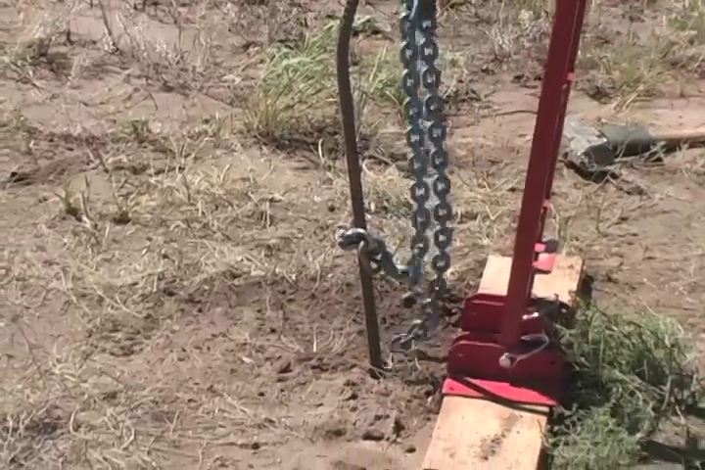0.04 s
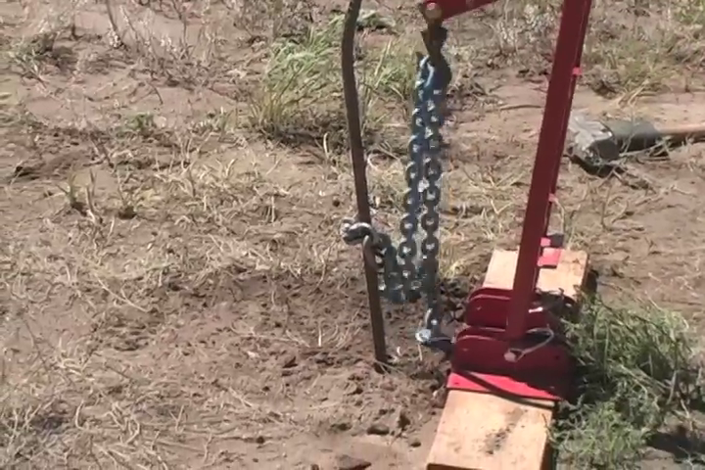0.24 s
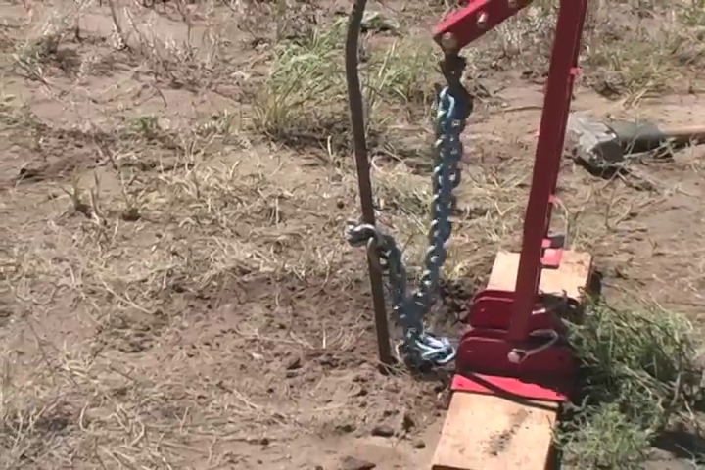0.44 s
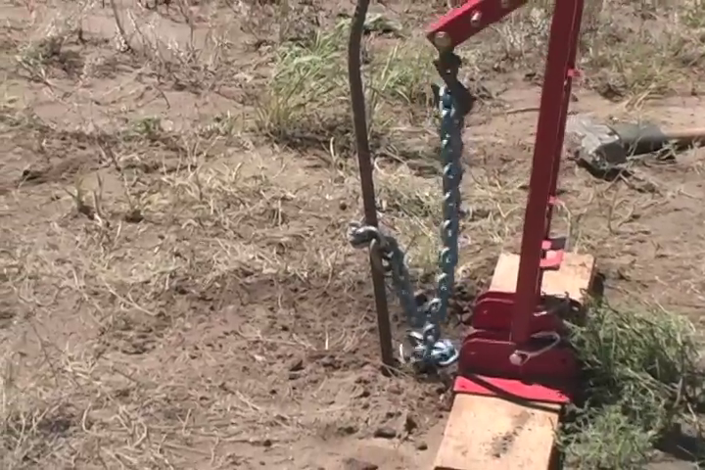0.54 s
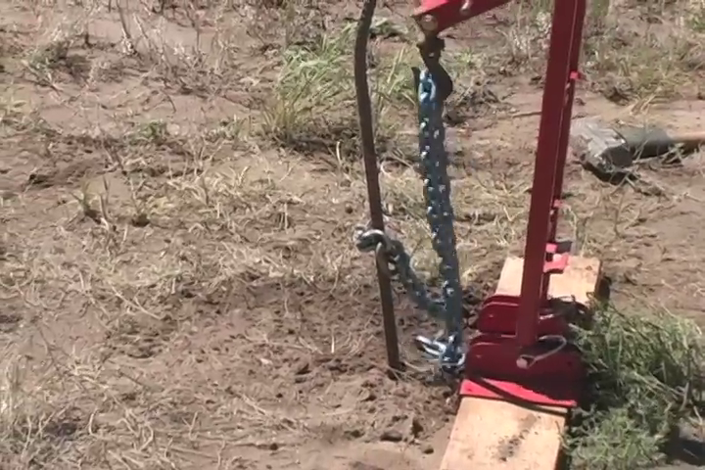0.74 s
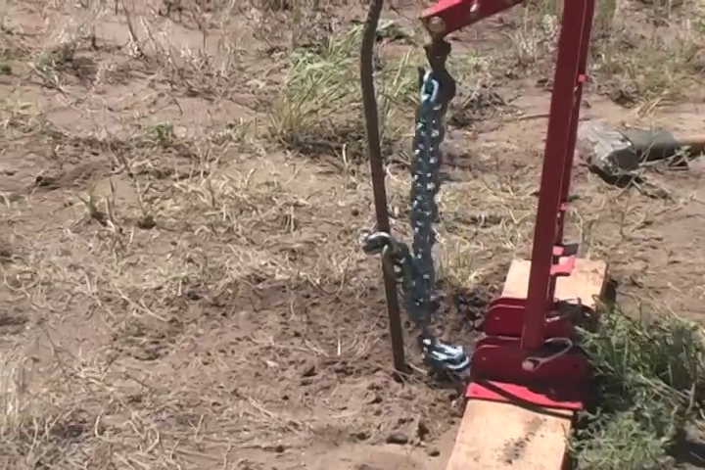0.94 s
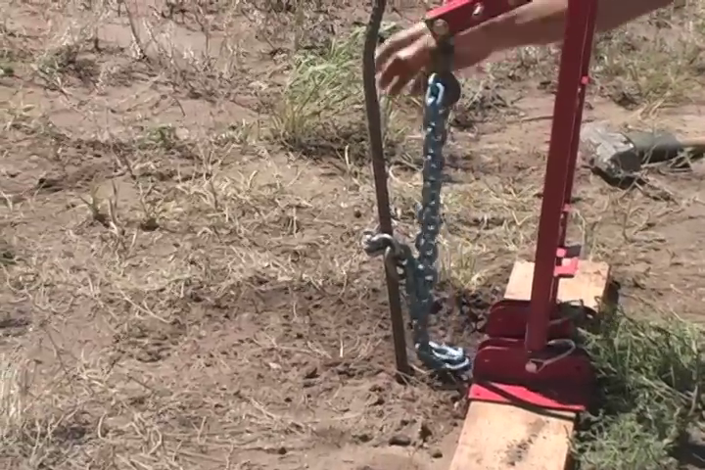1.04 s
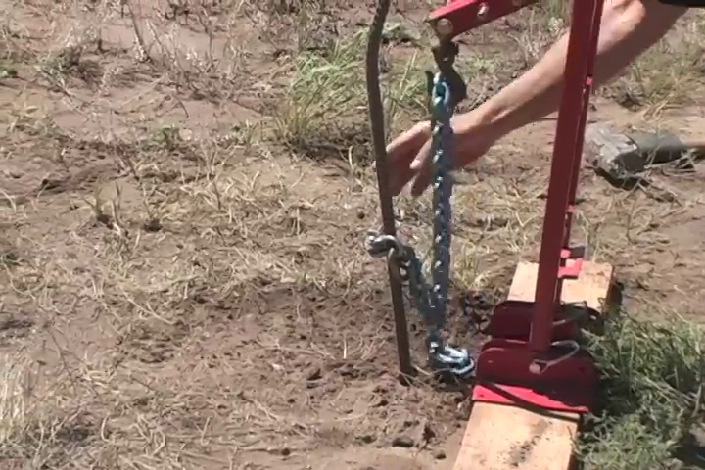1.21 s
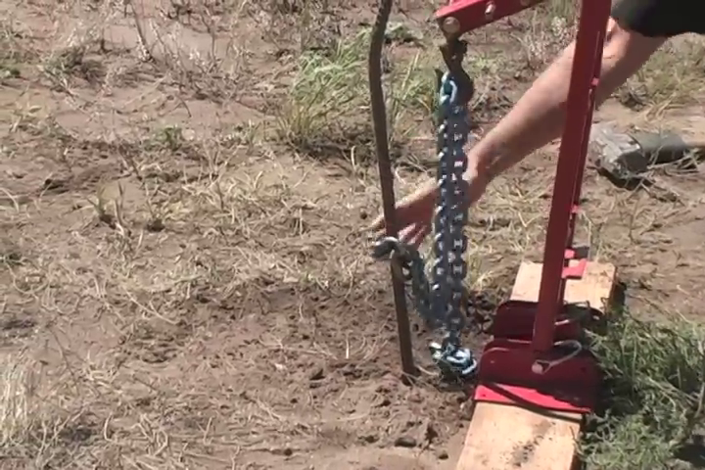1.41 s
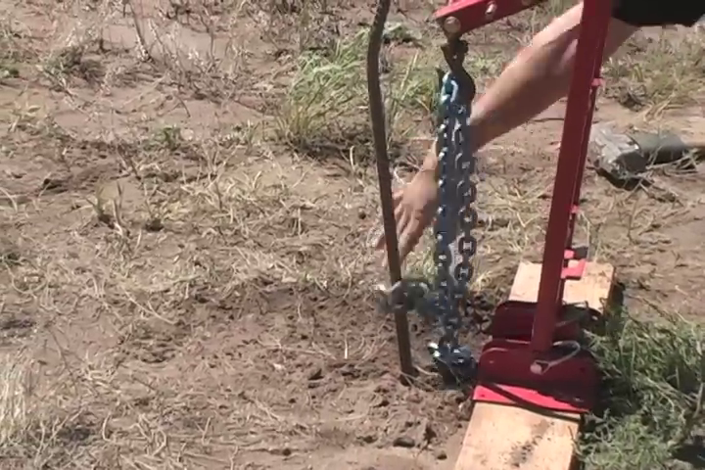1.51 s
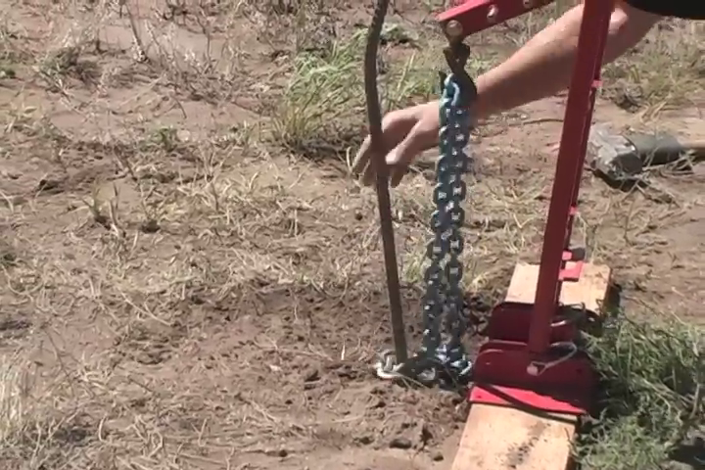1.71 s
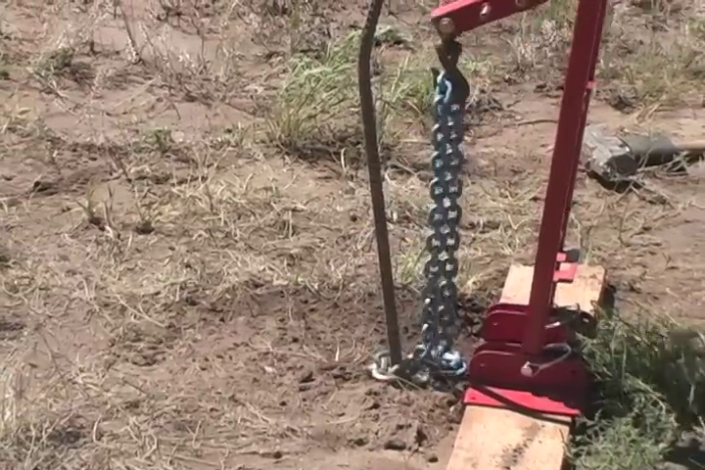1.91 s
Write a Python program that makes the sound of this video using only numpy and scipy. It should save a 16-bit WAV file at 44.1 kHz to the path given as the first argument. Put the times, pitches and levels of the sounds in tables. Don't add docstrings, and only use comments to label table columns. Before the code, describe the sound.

Close to a small stereo camera in a dry field, chain links rattle softly, then clatter hard onto steel, clink and ring in scattered drops, and finally creep to rest under faint air hush and bird whistles.

```python
import sys
import numpy as np
from scipy import signal
from scipy.fft import rfft, irfft
from scipy.io import wavfile
from scipy.ndimage import uniform_filter1d

SR = 44100
rng = np.random.default_rng(int(sys.argv[2]) if len(sys.argv) > 2 else 0)


def generate_wav(sig):
    pcm = np.round(np.clip(np.atleast_2d(sig).T, -1, 1) * 32767).astype(np.int16)
    wavfile.write(sys.argv[1], SR, pcm)


def boost(x):
    u = np.asarray(x, float) / 20
    return 10 ** u


N = 85995
MID_TO_SIDES = np.array([[1], [-1]])

# f/Hz, level/dB per Hz
STEEL_COLOUR = [(400, -17.5), (560, -10), (740, -32.5), (1100, -13), (2200, -4.5), (4000, 1.5), (6500, 1.5),
                (12500, 2.5), (16000, -33)]
# f/Hz, level/dB
SCATTER_COLOUR = [(500, 6), (1100, 10), (2200, 1), (4500, -9.5), (8000, -3), (12000, -3.5)]


def chain_fall(db, bright_hz, t60, body_db, size=11000):
    t = np.arange(size) / SR
    impact_db = 9 * np.exp(-t / .007)
    burst = clicks(size, per_s=4200, spread_db=3) * boost(impact_db - 60 * t / t60)
    burst *= 1 - np.exp(-t / .00053)
    burst[0] = boost(7)
    firm = np.clip(1 + (db + 48) / 20, .5, 1)
    bright_db = 11 - (db + 24) / 6
    treble_db = .6 * (db + 28.5)

    def colour_db(hz):
        bright = bright_db * np.exp(-(np.log2(hz / bright_hz) / (.85 * firm)) ** 2)
        body = body_db * np.clip(np.log2(2590 / hz) + .5, 0, 1.5)
        treble = treble_db * np.clip(np.log2(2 * hz / 7600) - .5, 0, 1)
        return curve(STEEL_COLOUR, hz) + bright + body + treble

    modes, short = 90, 2048
    place, luck, life = rng.random((3, modes))
    hz = 500 + 15000 * ((np.arange(modes) + place) / modes) ** 1.5
    mode_db = colour_db(hz) + 3 * np.log2(hz) / 2 + 14 * luck
    links = ring(hz, mode_db, firm * .045 * (.5 + life), short)

    noise = rng.standard_normal((2, short)) * boost(-60 * t[:short] / .006)
    crack = signal.fftconvolve(noise, causal_response(colour_db), axes=1)[:, :short]
    scatter_response = causal_response(lambda f: curve(SCATTER_COLOUR, f))[0]
    scatter = signal.fftconvolve(crack[1], scatter_response)[:short]

    hit = np.array([level(links, 0) + level(crack[0], -3), level(scatter, -14.5)])
    mid, side = signal.fftconvolve(burst[None], hit, axes=1)[:, :size]
    loudest = np.sqrt(uniform_filter1d(mid ** 2, size=220).max())
    return boost(db) / loudest * (mid + side * MID_TO_SIDES)


# t/s, level/dB, brightest f/Hz, rattle t60/s,
# body below the knee level/dB
FALLS = [(0.106, -51.5, 6200, 0.29, 18.5), (0.117, -57.5, 2980, 0.14, 1), (0.170, -52.5, 3400, 0.087, 6),
         (0.1831, -47.5, 4900, 0.083, 12.5), (0.2241, -48, 4000, 0.042, -2), (0.2294, -26, 4400, 0.15, 1.5),
         (0.241, -24, 3700, 0.1, -16.5), (0.2541, -27, 4130, 0.15, 14), (0.2635, -30, 5230, 0.13, -15),
         (0.275, -31, 4170, 0.18, 9.5), (0.302, -41, 5340, 0.11, 18), (.347, -36, 3300, .1, 0),
         (.3525, -38, 3300, .09, -2), (.3708, -33, 4600, .07, -1), (0.3816, -38, 5300, 0.13, 12.5),
         (.385, -38, 4840, 0.11, 14.5), (0.39, -45, 5300, 0.072, 20), (0.404, -37.5, 3430, 0.17, 3.5),
         (0.41, -50.5, 4200, 0.17, 18), (0.4467, -50, 6000, 0.45, 20.5), (0.4715, -29.5, 5330, 0.17, -9.5),
         (0.5653, -44, 3280, 0.03, 0.5), (0.57, -29.5, 4970, 0.24, 6.5), (.605, -57, 6000, 0.21, 6),
         (0.635, -36, 5100, 0.096, -25), (0.669, -40.5, 2850, 0.36, 2), (0.676, -49.5, 4530, 0.24, -2),
         (0.702, -43.5, 3460, 0.19, 8.5), (0.7151, -35.5, 5040, 0.023, 5), (0.7185, -33, 4950, 0.16, -29),
         (.7636, -42, 5750, 0.035, 13), (0.819, -45, 3780, 0.21, 9.5), (0.924, -40, 4400, 0.21, 19.5),
         (0.927, -32.5, 3700, 0.12, -20),
         (.9985, -52, 5000, .05, 0), (1.003, -44, 4800, .1, 3), (1.056, -63, 5000, .06, 0),
              (1.334, -67, 6000, .02, -14), (1.3385, -58, 7500, .02, -14), (1.352, -66, 6000, .02, -8),
              (1.366, -64, 11000, .02, -14), (1.467, -54, 4000, .07, -18), (1.487, -56, 3700, .05, -16),
              (1.501, -55, 4200, .05, -8), (1.8985, -59, 3900, .015, -10)]


def falling_chain():
    out = np.zeros((2, N))
    for s, *fall in FALLS:
        add(out, s, chain_fall(*fall))
    return out


def blow(modes, db, free_s, size=14000):
    hz, mode_db, t60 = np.array(modes, float).T
    favour_db, side_luck = rng.standard_normal((2, len(hz)))
    touch = uniform_filter1d(uniform_filter1d(rng.standard_normal(size), size=200), size=200)
    onset = np.minimum(np.arange(size) / (.00057 * SR), 1)
    damping = np.clip((free_s - np.arange(size) / SR) / .006, 0, 1)
    shape = onset * damping * boost(1.2 * touch / touch.std())
    mid = ring(hz, mode_db + favour_db, np.minimum(t60, .6), size)
    side = np.roll(mid, 9) * boost(-14) * side_luck[0]
    return shape * (mid + side * MID_TO_SIDES) * boost(db) / np.abs(mid).max()


# f/Hz, level/dB, t60/s
FRAME_MODES = [(2896, 0, .12), (4081, -6, .2), (4548, -6, .2), (4700, -5, .22), (5408, -3, .22),
               (5728, -5, .28), (6137, -2, .17), (6560, -4, .14)]
FOOT_MODES = [(1120, -2, .075), (3705, 0, .085), (4075, -3, .07), (7531, -13, .25), (9000, -19, .3),
              (510, -6, .07), (12430, -13, .1)]
HOOK_MODES = [(1210, -20, .3), (1265, -20, .25), (3365, 4, .05), (3338, -10, .7), (4090, -17, .2),
              (7422, 0, .17), (9955, -4, .08), (2196, -20, .2)]
LINK_MODES = [(4700, -2, .04), (5050, 0, .045), (6126, -6, .06), (8603, -6, .04), (9959, -6, .045),
              (11390, -10, .04)]
PARTS = dict(frame=FRAME_MODES, foot=FOOT_MODES, hook=HOOK_MODES, link=LINK_MODES)
# t/s, peak level/dB, time until a link damps it/s
BLOWS = dict(frame=[(.230, -24, .3), (.242, -27, .3), (.255, -26, .3), (.267, -30, .3)],
         foot=[(.4728, -24, .2)], hook=[(.7192, -24, .206), (.566, -37, .07), (.927, -39, .075),
         (1.004, -47, .042)], link=[(.6345, -19, .2)])


def struck_parts():
    out = np.zeros((2, N))
    for part, hits in BLOWS.items():
        for s, db, free_s in hits:
            add(out, s, blow(PARTS[part], db, free_s))
    return out


# t/s, peak level/dB, f/Hz, t60/s
CLINKS = [(0.184, -50.5, 1310, 0.19), (.184, -51, 1750, 0.091), (.184, -50, 2310, 0.09),
          (.231, -21.5, 2324, 0.018), (.2395, -22.5, 3705, 0.14), (0.245, -43, 1120, 0.33),
          (.300, -40, 2300, 0.28), (.352, -34, 10100, 0.026), (.352, -48, 6870, 0.18),
          (.349, -45, 4230, 0.094), (.350, -51, 925, 0.3), (0.372, -33, 4340, 0.08),
          (.373, -47, 5750, 0.032), (.384, -30, 5850, .07), (.4055, -29.5, 2786, 0.059),
          (.406, -34, 4500, 0.052), (0.449, -38, 5900, 0.042), (.449, -37, 6530, 0.048),
          (.472, -48, 1920, 0.23), (0.575, -47.5, 1930, 1), (.572, -61, 1650, 0.12),
          (.573, -42, 6030, 0.08), (.606, -37, 6050, 0.058), (.671, -37.5, 2836, 0.11),
          (.672, -44, 1407, .04), (.701, -51, 2830, .1), (.765, -44, 2140, 0.1), (.765, -50, 964, 0.064),
          (.820, -53, 1220, 0.09), (.820, -50.5, 1326, 0.15), (.821, -52, 4110, 0.074),
          (.927, -41, 524, 0.052), (.93, -38, 4870, 0.063), (1.003, -53, 5550, 0.07),
          (1.004, -44.5, 514, 0.096), (1.005, -56, 4040, 0.066), (1.058, -65, 2860, 0.076),
          (1.474, -57, 12300, 0.021), (1.488, -54, 3650, 0.085), (0.446, -46, 520, 0.074),
          (.567, -46.5, 526, 0.078), (.724, -56, 2640, 0.16)]


def clinking_links():
    out = np.zeros((2, N))
    size = 8000
    for s, db, hz, t60 in CLINKS:
        halves = [(hz, 0, t60), (hz * 1.022, -9, t60)]
        add(out, s, blow(halves, db, size / SR, size))
    return out


# t/s, peak level/dB, centre f/Hz
TICKS = [
    (.2313, -16, 4500),
    (.2546, -16, 4500),
    (.7197, -20, 5000),
    (.829, -56, 11000),
    (.852, -58, 12000),
    (0.8602, -37.5, 6900),
    (0.8667, -39, 8000),
    (1.104, -34.5, 12900),
    (1.1096, -38, 13000),
    (1.6014, -50.5, 7000),
]


def dry_ticks():
    out = np.zeros((2, N))
    size = 400
    for s, db, hz in TICKS:
        snap = (1 + .12 * rng.standard_normal(size)) * np.exp(-np.arange(size) / (.00004 * SR))
        add(out, s, peak(band(band(snap, hz, .55 * hz), hz, .63 * hz), db)[None])
    return out


# t/s, level/dB, resonance f/Hz
SETTLE = [
    (1.017, -87, 5800),
    (1.07, -73.5, 5600),
    (1.2, -72, 4800),
    (1.351, -72.5, 4300),
    (1.42, -80, 4200),
    (1.498, -73, 4200),
    (1.56, -107, 4200),
]


def settling_heap():
    s, db, hz = np.array(SETTLE, float).T
    t = np.arange(N) / SR
    grit = clicks(N, per_s=9000, spread_db=1.5)
    carrier = np.exp(2j * np.pi * np.cumsum(np.interp(t, s, hz)) / SR)
    smooth = signal.lfilter([1], [1, -.94], signal.lfilter([1], [1, -.9], grit))
    high_pass = signal.butter(2, 2500, "high", fs=SR, output="sos")
    scrape = level(signal.sosfilt(high_pass, (smooth * carrier).real), 0)
    upper = level(band(grit, 7020, 1200), -2)
    wide = level(band(grit, 9800, 8900), -2.5)
    swell_db = np.interp(t, s, db, left=-120, right=-120) + .5 * walk(25)
    return (scrape + upper + wide) * boost(swell_db)


# t/s, level/dB, start f/Hz, fall f/Hz, length/s
CHIRPS = [
    (.895, -66, 5700, 550, .016),
    (1.736, -70, 5600, 400, .016),
    (1.765, -69, 5650, 550, .017),
    (1.798, -69, 5650, 650, .019),
    (1.856, -71, 5600, 350, .014),
    (1.882, -72, 5750, 150, .026),
    (1.915, -74, 5800, 80, .035),
]


def birds():
    out = np.zeros((1, N))
    for s, db, hz, drop_hz, length in CHIRPS:
        u = np.arange(int(length * SR)) / (length * SR)
        breath_db = 2 * rng.standard_normal(len(u)).cumsum() / np.sqrt(len(u))
        whistle = np.sin(2 * np.pi * np.cumsum(hz - drop_hz * u) / SR)
        add(out, s - .003, boost(db - .5 + breath_db) * np.sin(np.pi * u) * whistle)
    return out


# f/Hz, level/dB per Hz
FIELD_COLOUR = [(12, -56), (20, -13.5), (92, -7.5), (788, -23.5), (906, -23.5), (9130, -35.5),
                (15500, -31.5)]
# f/Hz, width f/Hz, level/dB
DRONES = [(60.2, 4, -71.5), (95, 25, -72.5), (226, 120, -75)]


def field():
    hz = np.maximum(np.fft.rfftfreq(N, 1 / SR), 1)
    width = [np.ones_like(hz), np.minimum(hz / 250, 1)]
    mid, side = irfft(rfft(rng.standard_normal((2, N))) * boost(curve(FIELD_COLOUR, hz)) * width, N)
    out = level(mid + boost(-5) * side * MID_TO_SIDES, -66.5) * boost(.24 * walk(15))
    for drone_hz, width_hz, db in DRONES:
        drone = band(band(rng.standard_normal(N), drone_hz, width_hz), drone_hz, width_hz)
        out = out + level(drone, db)
    whine = np.sin(2 * np.pi * 15734 * np.arange(N) / SR + .3 * walk(43))
    return out + level(whine, -80) * boost(1.7 * walk(12.3))


def clicks(size, per_s, spread_db):
    chance, sign, strength = rng.random((3, size))
    strength_db = spread_db * np.minimum(-np.log(1 - strength), 3)
    return (chance < per_s / SR) * np.sign(sign - .5) * boost(strength_db)


def ring(hz, db, t60, size):
    t = np.arange(size)[:, None] / SR
    return (np.sin(2 * np.pi * hz * t) * np.exp(-np.log(1000) * t / t60)) @ boost(db)


def band(x, hz, width_hz):
    return signal.lfilter(*signal.iirpeak(hz, hz / width_hz, fs=SR), x)


def walk(rate_hz):
    k = int(SR / rate_hz)
    wander = uniform_filter1d(uniform_filter1d(rng.standard_normal(N + 4 * k), k), k)[2 * k:2 * k + N]
    return wander / wander.std()


def curve(table, hz):
    table_hz, db = np.array(table, float).T
    return np.interp(np.log(hz), np.log(table_hz), db)


def causal_response(colour_db, size=512):
    hz = np.maximum(np.fft.rfftfreq(size, 1 / SR), 50)
    cepstrum = irfft(colour_db(hz) * np.log(10) / 20)
    cepstrum[1:size // 2] *= 2
    cepstrum[size // 2 + 1:] = 0
    return irfft(np.exp(rfft(cepstrum)))[None]


def peak(x, db):
    return x * boost(db) / np.abs(x).max()


def level(x, db):
    return x * boost(db) / np.sqrt(np.mean(x ** 2))


def add(out, s, x):
    i = int(s * SR)
    out[:, i:i + x.shape[-1]] += x[..., :N - i]


def scene():
    steel = falling_chain() + struck_parts() + clinking_links() + dry_ticks() + settling_heap()
    steel_band = signal.butter(3, [750, 14000], "band", fs=SR, output="sos")
    steel = signal.sosfilt(steel_band, steel)
    left_db = 3.0
    return (steel + field() + birds()) * boost(left_db / 2 * MID_TO_SIDES)


def band_limit(x):
    return signal.sosfilt(signal.butter(12, 16800, fs=SR, output="sos"), x)


# f/Hz, extra left level/dB
PORT_LEAN = [(300, -.5), (600, .6), (1200, 0), (5000, 0), (8500, 1.8), (12500, -.3)]


def record(dry):
    hz = np.maximum(np.fft.rfftfreq(N, 1 / SR), 1)
    lean_db = curve(PORT_LEAN, hz) / 2 * MID_TO_SIDES
    heard = irfft(rfft(dry) * boost(lean_db), N)
    top_cut = signal.ellip(6, .5, 40, 15900, fs=SR, output="sos")
    return band_limit(signal.sosfilt(top_cut, heard))


dry = scene()
out = record(dry)
generate_wav(out)
```